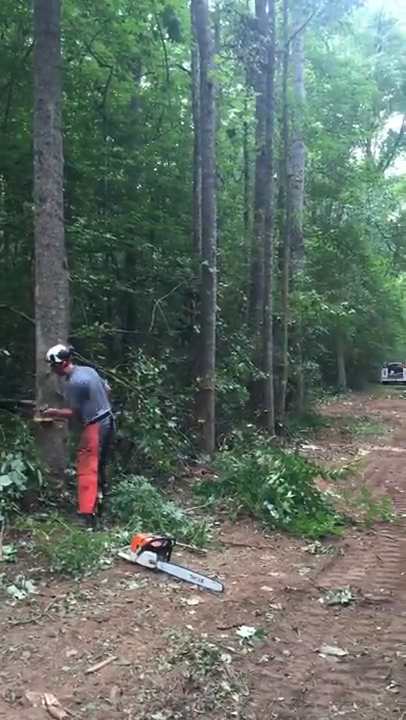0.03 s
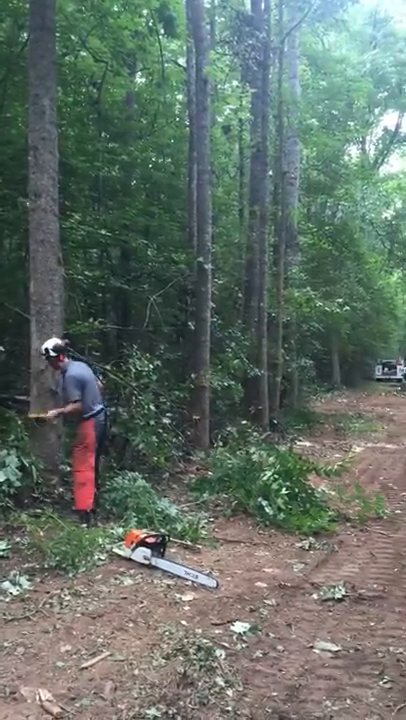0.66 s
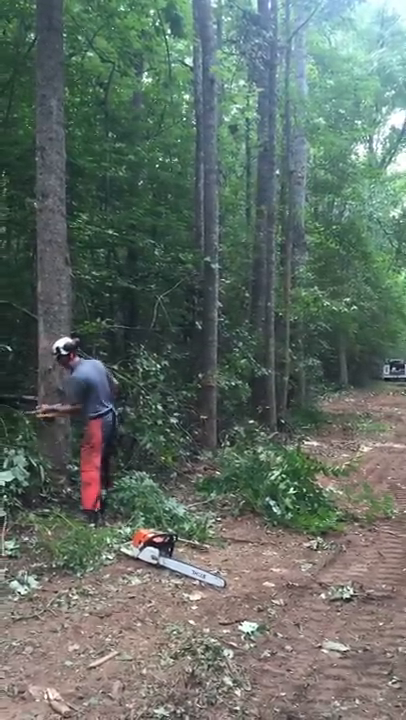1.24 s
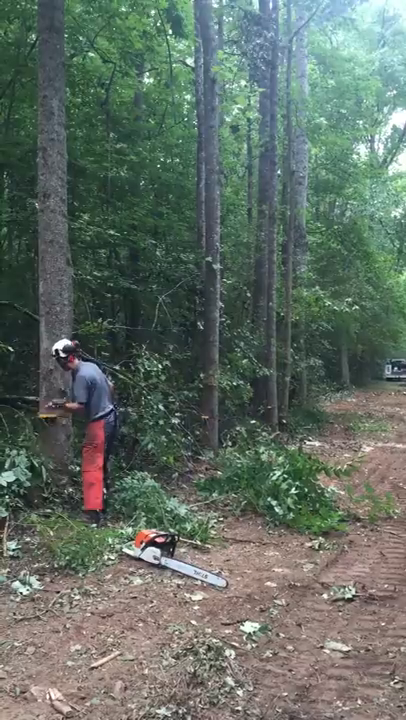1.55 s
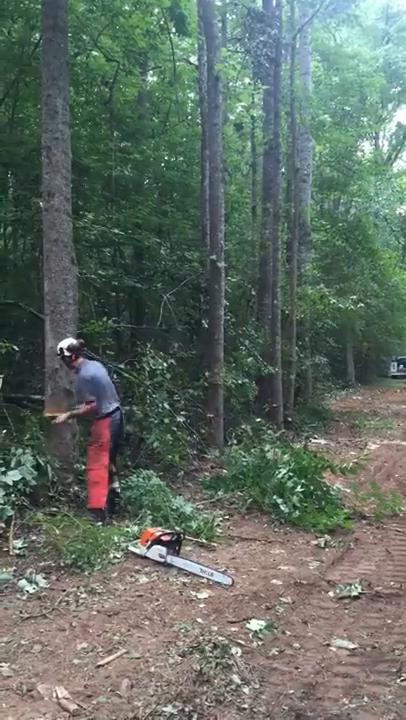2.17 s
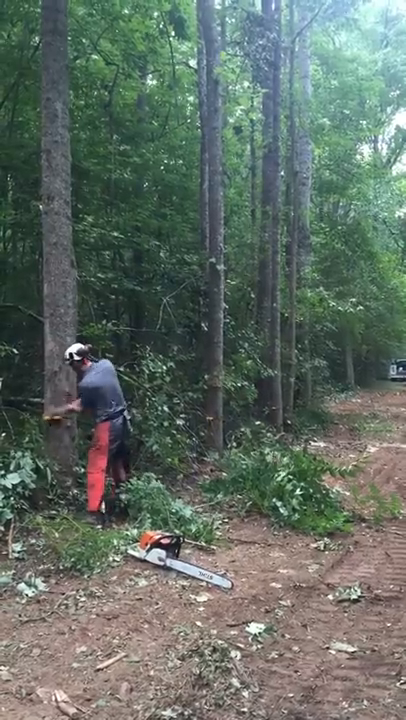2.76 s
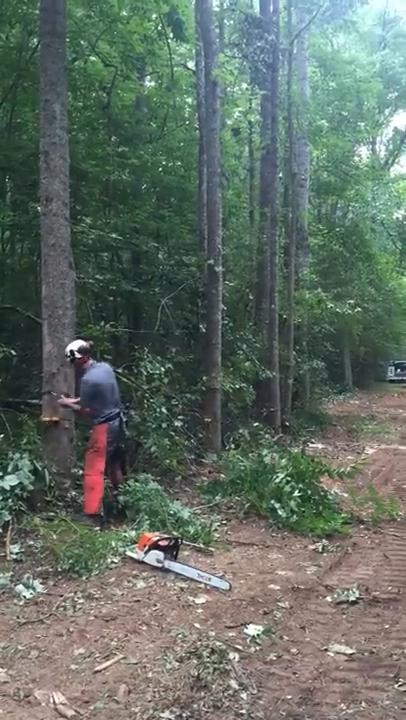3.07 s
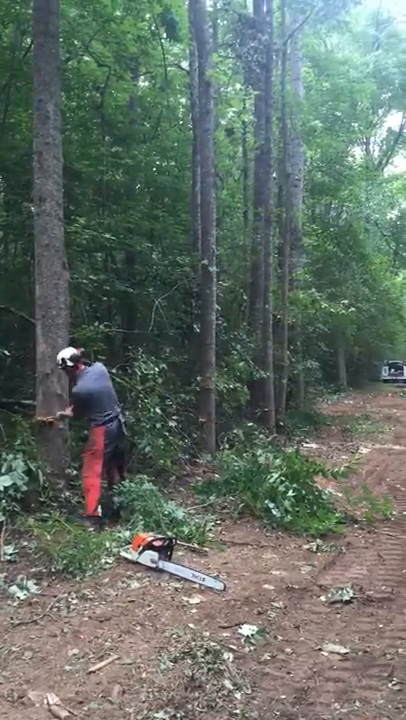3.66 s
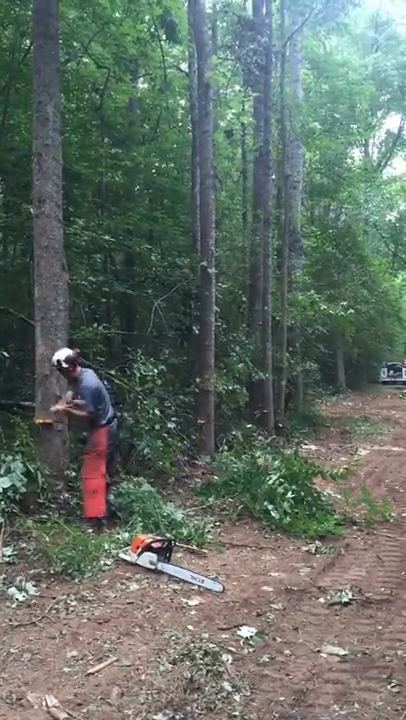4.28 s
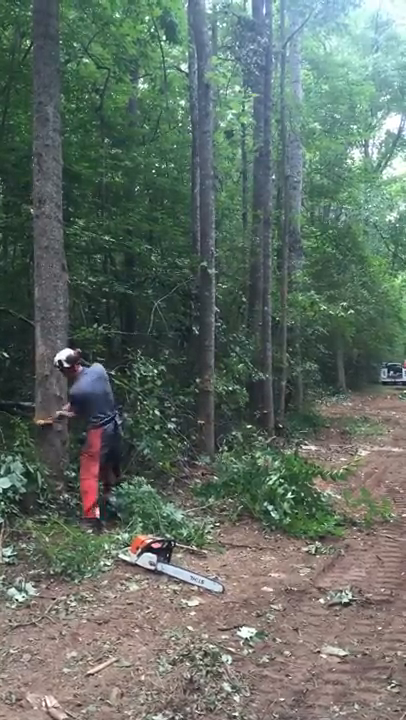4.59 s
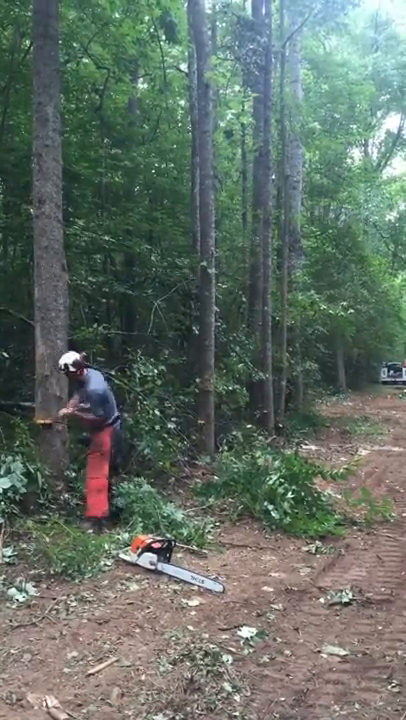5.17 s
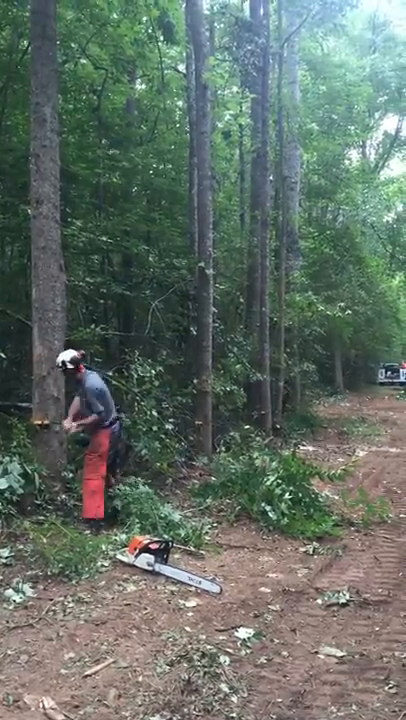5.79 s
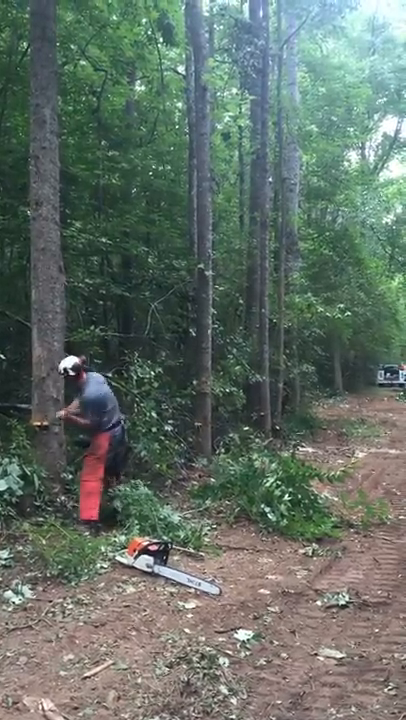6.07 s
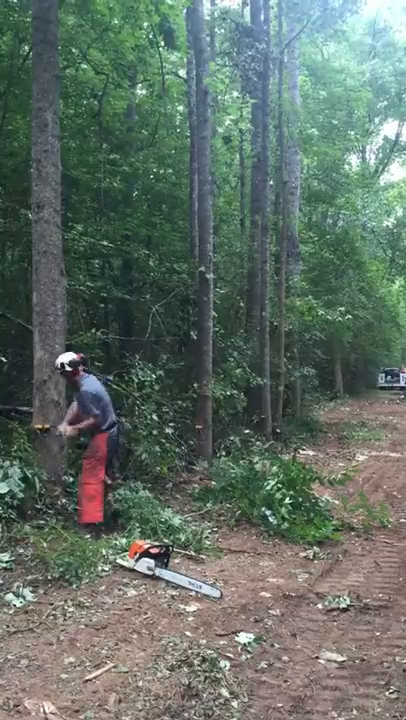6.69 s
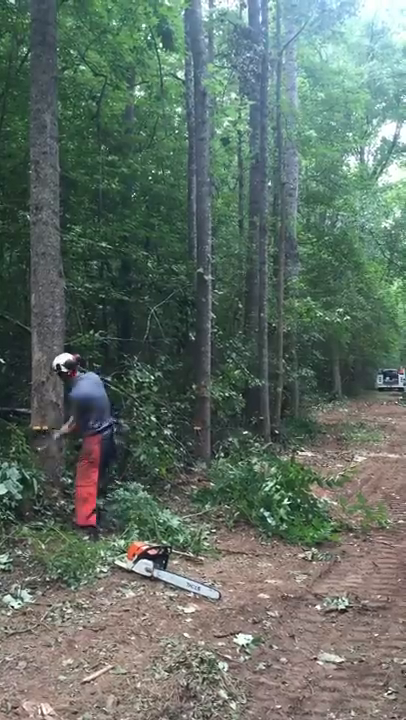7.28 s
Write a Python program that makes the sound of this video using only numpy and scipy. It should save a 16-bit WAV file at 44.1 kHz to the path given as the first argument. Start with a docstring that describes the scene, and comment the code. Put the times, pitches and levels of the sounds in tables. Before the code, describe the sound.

Hard, evenly spaced knocks of an axe on a felling wedge echo briefly through a forest, with faint insects and a far-off engine.

```python
"""Hard knocks, close to the microphone in a forest clearing: an axe drives a felling wedge into a standing
tree. Each blow rings the wedge, cracks fibres and thumps the stem, overloads the microphone and scatters
back from the trunks around. Dry litter crackles underfoot. Farther off, insects shrill in the trees over
a faint stir of leaves, and a distant engine idles, then speeds up near the end."""
import sys
import numpy as np
from scipy import signal
from scipy.fft import rfft, irfft, next_fast_len
from scipy.io import wavfile

SR = 44100
rng = np.random.default_rng(int(sys.argv[2]) if len(sys.argv) > 2 else 0)


def transcribe(signal):
    """Save signal, clipped to [-1, 1], as a 16-bit WAV file at the path in sys.argv[1]."""
    frames = np.atleast_2d(signal).T
    limited = np.clip(frames, -1, 1)
    pcm = np.round(limited * 32767).astype(np.int16)
    wavfile.write(sys.argv[1], SR, pcm)


N = 323694
TIME = np.arange(N) / SR


def from_db(db):
    return 10 ** (np.asarray(db) / 20)


def rms_one(x):
    return x / np.sqrt(np.mean(x ** 2) + 1e-20)


def decay(t, db, t60):
    """Envelope that starts at db and falls 60 dB in t60 seconds."""
    return from_db(db - 60 * t / t60)


def add(track, s, sound):
    """Mix a sound into the track at time s, which may lie before the start."""
    at = round(s * SR)
    sound, at = sound[max(0, -at):], max(0, at)
    track[at:at + len(sound)] += sound[:N - at]


def butter(x, hz, kind, order=2):
    """Causal Butterworth filter."""
    sections = signal.butter(order, np.clip(hz, 10, .48 * SR), kind, fs=SR, output="sos")
    return signal.sosfilt(sections, x)


def band(x, low_hz, high_hz):
    """One band of a signal, rms 1."""
    return rms_one(butter(x, [low_hz, high_hz], "band"))


def gain_at(spectrum, hz):
    """Gain of a table of f/Hz, level/dB, read on a log-frequency axis."""
    points, db = np.transpose(spectrum)
    return from_db(np.interp(np.log(hz + 1), np.log(points), db))


def coloured(spectrum):
    """Steady noise with the given spectrum, rms 1."""
    size = next_fast_len(N)
    gain = gain_at(spectrum, np.fft.rfftfreq(size, 1 / SR))
    return rms_one(irfft(rfft(rng.standard_normal(size)) * gain, size)[:N])


def drift(rate_hz):
    """Slow random wander, rms 1."""
    return rms_one(np.interp(TIME * rate_hz, np.arange(2000), rng.standard_normal(2000)))


def ring(t, hz, db, t60):
    """One struck mode."""
    return decay(t, db, t60) * np.sin(2 * np.pi * hz * t)


def struck(t, modes, vary_db, detune):
    """All modes of a body; each blow lands a little differently."""
    chance = rng.standard_normal((len(modes), 2))
    return sum((-1) ** k * ring(t, hz * (1 + detune * sharp), db + vary_db * loud, t60)
               for k, ((hz, db, t60), (loud, sharp)) in enumerate(zip(modes, chance)))


# spectrum of the leaves all around the microphone: f/Hz, level/dB
LEAF_SPECTRUM = [(100, -18.5), (400, 3), (700, -0.5), (1400, 1), (2200, -3), (3500, -6.5), (5000, -13.5),
                 (7500, -17.5), (9500, -20), (11000, -29), (16000, -29)]

def leaves(level_db=-62.5, patchy_db=1.0):
    """Leaves stir faintly around the clearing: each band swells and fades on its own."""
    white = rng.standard_normal((2, N))
    edges, out = np.geomspace(100, 17000, 22), 0
    for k, (low, high) in enumerate(zip(edges, edges[1:])):
        rustle = butter(white[k % 2], [low, high], "band") * gain_at(LEAF_SPECTRUM, np.sqrt(low * high))
        out = out + rustle * from_db(patchy_db * drift(21))
    return from_db(level_db) * rms_one(out)


# insect chorus up in the trees: f/Hz, width/Hz, level/dB
INSECT_BANDS = [(6200, 140, -67.5), (6687, 380, -62.5), (5670, 200, -81)]

def insects(throb_db=1.5):
    """Many small singers blur into narrow, trembling bands."""
    out = 0
    for hz, width, db in INSECT_BANDS:
        throb = from_db(db + throb_db * drift(17))
        out = out + throb * band(rng.standard_normal(N), hz - width / 2, hz + width / 2)
    return out


# exhaust lines of the distant engine: f/firing rate, level/dB
EXHAUST_LINES = [(1, -60), (2, -46.5), (3, -52), (4, -60), (5, -62), (6, -68), (8, -73), (11, -76)]
# two low humming tones between the exhaust harmonics: f/firing rate, level/dB
HUM_LINES = [(5.567, -59), (6.14, -51)]
# spectrum of the engine's rumble at the microphone: f/Hz, level/dB
RUMBLE_SPECTRUM = [(22, -43), (38, -9), (55, -6), (80, 6), (110, 6.5), (145, -6.5), (180, -2), (225, -10),
                   (260, -17), (400, -25), (800, -52)]

def engine(idle_hz=37.8, rev_start_s=6.38, rev_hz_per_s=7.1, throttle_s=0.5, rumble_db=-48, waver_db=2):
    """Far off, an engine idles and speeds up; its low exhaust lines and rumble are heard with a hum."""
    revving_s = np.maximum(TIME - rev_start_s, 0)
    firing_hz = (idle_hz + rev_hz_per_s * revving_s) * (1 + 0.00046 * drift(6.5))
    phase = 2 * np.pi * np.cumsum(firing_hz) / SR

    def tones(lines):
        return sum(from_db(db + waver_db * drift(8.8)) * np.sin(k * phase + 2 * np.pi * rng.random())
                   for k, db in lines) * np.sqrt(2)

    # as the engine speeds up, the exhaust swells and the hum fades
    throttle = np.minimum(revving_s / throttle_s, 1)
    exhaust = from_db(-1 + 5 * throttle) * tones(EXHAUST_LINES)
    hum = from_db(-13 * throttle) * tones(HUM_LINES)
    return exhaust + hum + from_db(rumble_db) * coloured(RUMBLE_SPECTRUM)


def crackle(db, hz, swell_s, fade_s, tail_db=-26.5, tail_s=.025):
    """A burst of dry grains with a faint tail."""
    t = np.arange(SR // 4) / SR
    grains = rng.standard_normal(len(t)) * from_db(6.5 * rng.standard_normal(len(t)))
    after = np.maximum(t - swell_s, 0)
    fade = np.exp(-after / fade_s) + from_db(tail_db) * np.exp(-after / tail_s)
    return from_db(db) * np.minimum(t / swell_s, 1) * fade * band(grains, hz / 1.5, hz * 1.27)


# twigs snapping underfoot: t/s, level/dB, f/Hz
TWIG_SNAPS = [(3.158, -51, 794), (5.925, -46, 10440), (6.09, -55, 1200), (6.125, -57.5, 1200),
              (6.957, -46, 1940)]

def litter(tick_count=4, tick_db=-67, tick_hz=10000, attack_s=.0011, scuff_s=6.91, swell_s=.022):
    """On the forest floor twigs snap, dry leaves tick at random, and a boot scuffs once."""
    out = np.zeros(N)
    ticks = [(s, tick_db, tick_hz) for s in rng.random(tick_count) * TIME[-1]]
    for s, db, hz in TWIG_SNAPS + ticks:
        fade_s = .012 * (1000 / hz) ** 0.46  # thin twigs sound higher and die sooner
        add(out, s - attack_s, crackle(db, hz, attack_s, fade_s))
    scrape = crackle(db=-50.5, hz=4570, swell_s=swell_s, fade_s=.034)
    hiss = crackle(db=-59, hz=11000, swell_s=swell_s, fade_s=.048)
    add(out, scuff_s - swell_s, scrape + hiss)
    return out


# colour of the scatter from the trunks around the clearing: f/Hz, level/dB
SCATTER_SPECTRUM = [(100, -6.5), (280, 1.5), (450, 2.5), (600, 6), (730, -25.5), (900, -4.5), (1150, -5.5),
                    (1500, 1), (2500, -1.5), (4200, 2.5), (7000, 2), (9000, 0), (11000, -4), (15000, -2.5)]

def forest_echoes(grain_db=2.5, clump_db=2.0, near_s=.0048, far_s=.24):
    """Echoes of trunks standing in clumps; the longer the path, the more treble leaves and air take."""
    t = np.arange(SR) / SR
    echoes = rng.standard_normal((2, SR))
    echoes *= from_db(grain_db * rng.standard_normal((2, SR)) + clump_db * drift(70)[:SR])
    edges, out = np.geomspace(90, 17000, 24), 0
    for k, (low, high) in enumerate(zip(edges, edges[1:])):
        hz = np.sqrt(low * high)
        loss_db_per_s = .8 * hz / 1000 + .23 * (hz / 1000) ** 2  # to leaves, to the air
        scatter = butter(rms_one(echoes[k % 2]), [low, high], "band") * gain_at(SCATTER_SPECTRUM, hz)
        out = out + scatter * from_db(-loss_db_per_s * t)
    # the near trunks answer at once, the far edge of the clearing builds up and lingers
    near = decay(t, db=0.5, t60=.42) * (t > near_s)
    far = np.minimum(t / far_s, 1) * decay(np.maximum(t - far_s, 0), db=-19, t60=1.32)
    return out * np.hypot(near, far)


def shudder(hz=281, detune=.098, trips=3, trip_loss_db=0.8, first_s=.011, trip_s=.023, jitter_s=.002):
    """After a blow, bending waves run along the stem and come back, weaker on every trip."""
    t = np.arange(SR // 4) / SR
    out = np.zeros(N)
    for trip, (late, sharp) in enumerate(rng.standard_normal((trips, 2))):
        wave = ring(t, hz * (1 + detune * sharp), db=-19.5 - trip_loss_db * trip, t60=.064)
        add(out, first_s + trip_s * trip + jitter_s * late, wave)
    return butter(out[:len(t)], 350, "low")


# modes of the wedge and axe head in the cut: f/Hz, level/dB, t60/s
WEDGE_MODES = [(1266.6, -7, 0.033), (1449, -6, 0.024), (1725, -4.5, 0.018), (2093, -4, 0.022),
               (2477, -5, 0.021), (2790, -10.5, 0.028), (3192, -5, 0.014), (4100, -4, 0.013),
               (4460, -8, .018), (5940, -13.5, 0.017), (7440, -16, .011), (8320, -11.5, 0.023),
               (9070, -12.5, 0.049)]
# wood around the cut, tuned by the seat of the wedge: f/knock pitch, level/dB, t60/s
CUT_MODES = [(.66, -16.5, 0.026), (0.798, -13, 0.03), (1, -0.5, .041), (1.112, -8, 0.03)]
# low thump of the stem: f/Hz, level/dB, t60/s
STEM_MODES = [(169.3, -15, 0.076), (255, -27, 0.068), (346, -27, 0.056)]

def knock(hardness_db, knock_hz, knock_db, thump_db, judder_hz, judder_db, detune, drive_s=.0024):
    """One blow at the tree: the wedge rings and slips, fibres crack and crush, the stem answers."""
    t = np.arange(SR // 8) / SR
    grit = rng.standard_normal((4, len(t)))
    snap = decay(t, hardness_db - 11, t60=.0047) * butter(grit[3], 3300, "high")
    fibres = butter(butter(grit[0], 1300, "high"), 3400, "low", order=1)
    crack = decay(t, hardness_db, t60=.023) * fibres
    crush = decay(t, -13.5, t60=.032) * band(grit[2], 560, 1100)
    # the wedge judders forward for a few milliseconds, at a pitch set by how tightly it sits
    judder = decay(t, judder_db + 3.5, t60=.025) * band(grit[1], .955 * judder_hz, 1.045 * judder_hz)
    contact_hz = 4970 * 2 ** (hardness_db / 13.5)  # a harder contact is shorter and so brighter
    wedge = butter(struck(t, WEDGE_MODES, vary_db=2, detune=detune), contact_hz, "low")
    seated_modes = [(knock_hz * ratio, knock_db + db, t60) for ratio, db, t60 in CUT_MODES]
    cut = struck(t, seated_modes, vary_db=-2, detune=detune / 2)
    thump = from_db(thump_db) * struck(t, STEM_MODES, vary_db=1, detune=detune)
    build_up = 1 - np.exp(-t / drive_s)  # the heavy wood gets moving as the wedge is driven home
    return snap + crack + crush + judder + wedge + (cut + thump) * build_up


# axe on wedge, close to the microphone: t/s, level/dB, contact hardness/dB,
# knock f/Hz, knock level/dB, thump level/dB, judder f/Hz, judder level/dB
AXE_BLOWS = [ (-0.53, -0.5, -2, 890, -2.5, 2, 3230, -8.5), (0.3103, -2, 7, 885, -1, -0.5, 3074, -9),
             (1.1534, 0, 2.5, 844, -4, -8, 1536, 1), (1.9520, -1, 6, 844, -5, 1.5, 1443, -3),
             (2.867, -4, -15, 860, 3, 2.5, 1378, -6), (3.7773, 0, -2.5, 889, 1, -0.5, 1757, -8.5),
             (4.6247, -0.5, 4, 902, -4, 2, 1320, -3), (5.4473, -3.5, 3.5, 823, -2.5, 0, 6160, -7),
             (6.3098, -2, 4, 856, 1.5, 4, 2108, -1), (7.17, -0.5, 5, 876, -0.5, 4.5, 1756, -10.5), ]

def hammering(forest_db=-40, echo_growth=1.44, direction_count=7):
    """The blows, the shudder of the stem, and the forest's answer from several directions."""
    out = np.zeros(N)
    directions = [forest_echoes() for _ in range(direction_count)]
    for s, db, *contact in AXE_BLOWS:
        add(out, s, from_db(db) * knock(*contact, detune=.014))
        add(out, s, from_db(db) * shudder())
        # the knock radiates a different colour each way, so its echoes blend into a smooth wash
        wash = sum(signal.fftconvolve(knock(*contact, detune=.047), echoes) for echoes in directions)
        add(out, s, from_db(forest_db + echo_growth * db) * wash / np.sqrt(direction_count))
    return out


def scene():
    """One microphone by the tree: the work in front, the sounds of the clearing behind."""
    return (hammering() + litter() + engine() + insects() + leaves())[None]


def record(dry, cutoff_hz=15700):
    """The first milliseconds of each knock overload the microphone; the highest treble is cut."""
    flattened = dry / (1 + np.abs(dry) ** 5) ** (1 / 5)
    return signal.sosfilt(signal.ellip(10, .1, 70, cutoff_hz, fs=SR, output="sos"), flattened)


dry = scene()
out = record(dry)
transcribe(out)
```